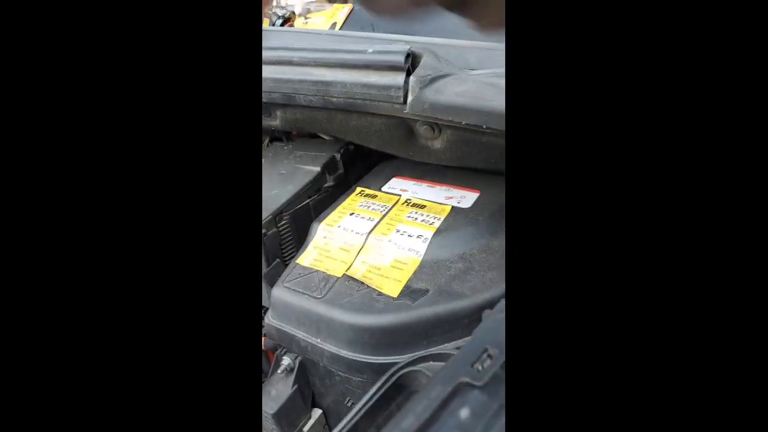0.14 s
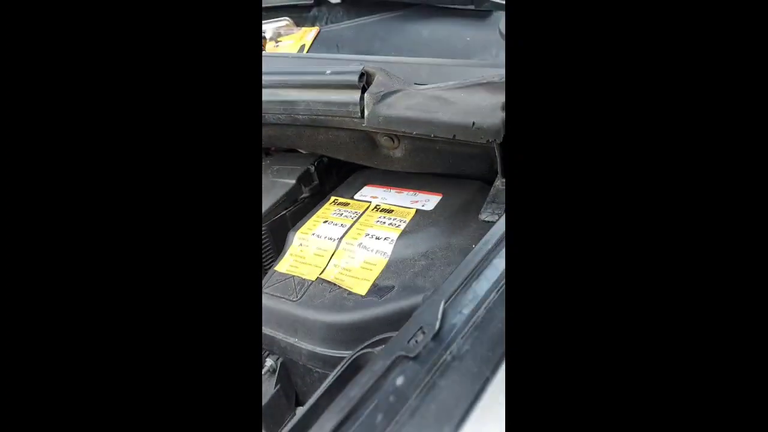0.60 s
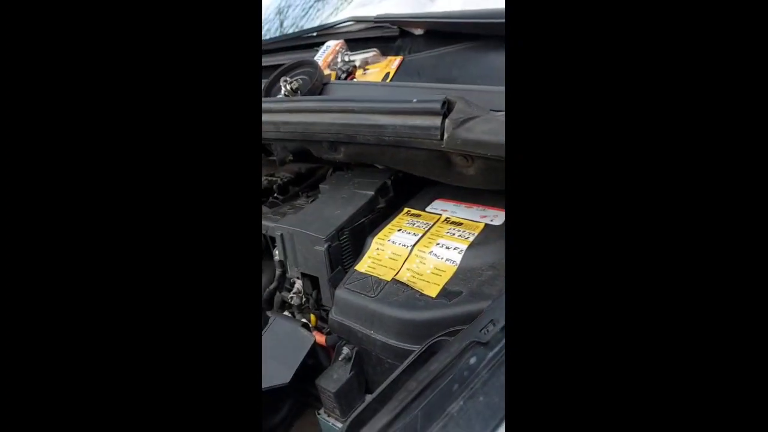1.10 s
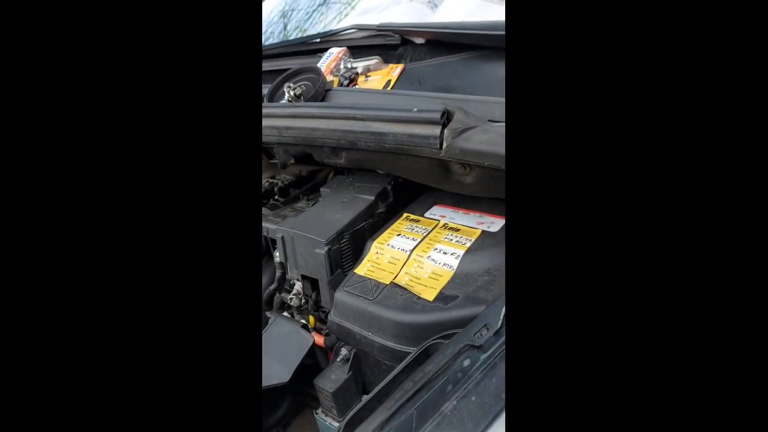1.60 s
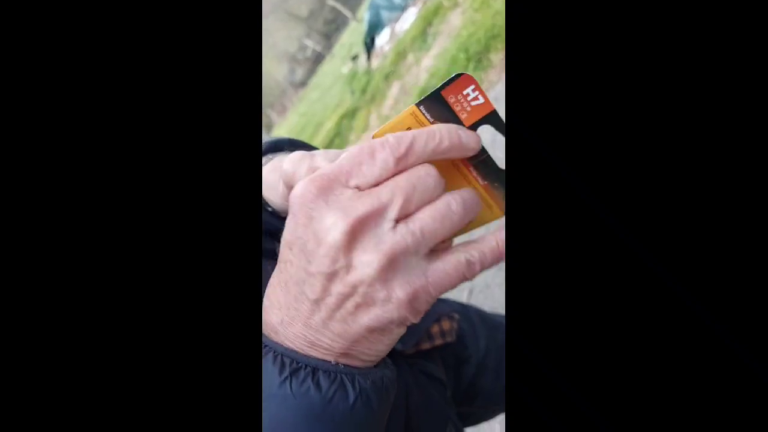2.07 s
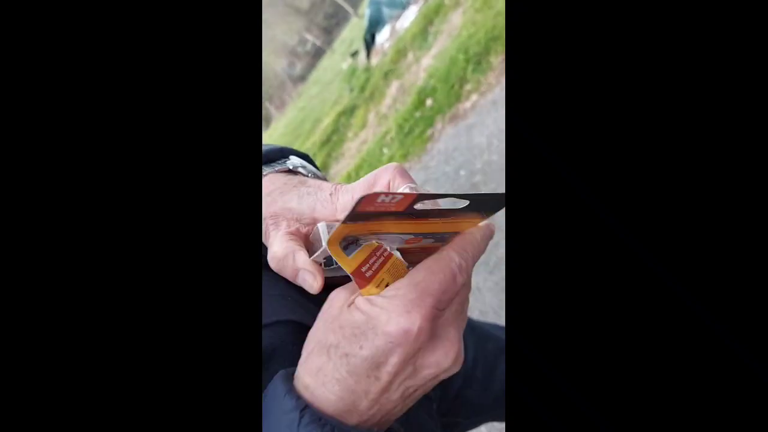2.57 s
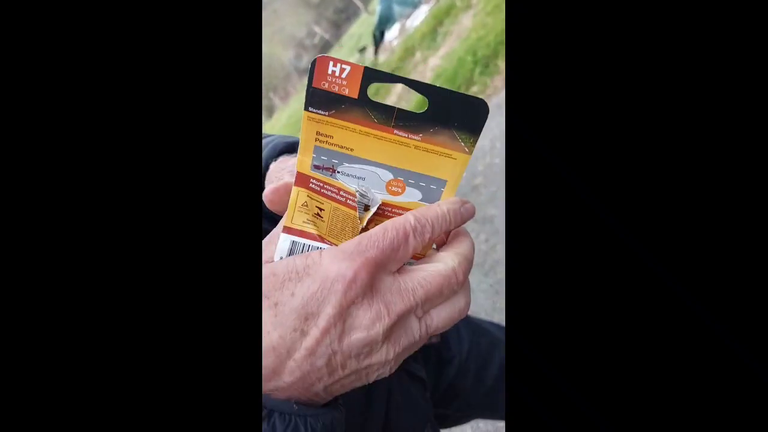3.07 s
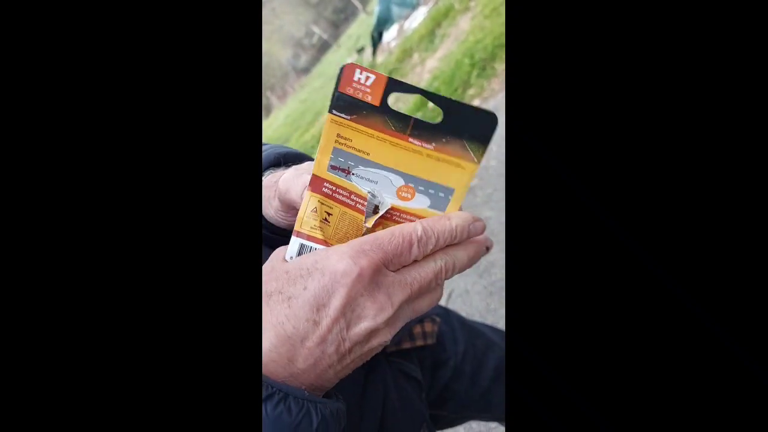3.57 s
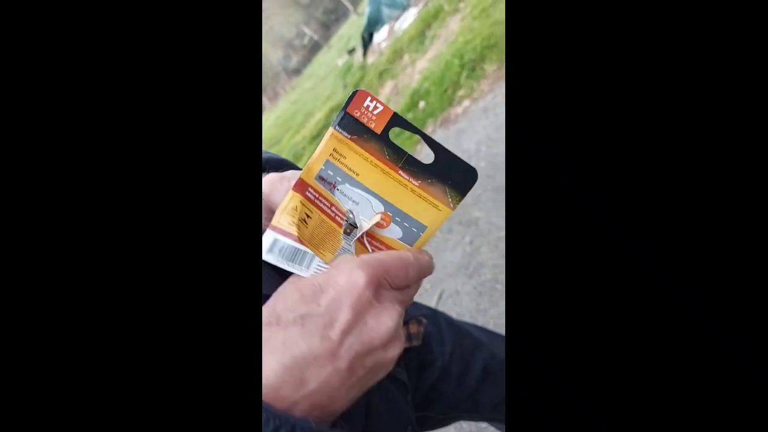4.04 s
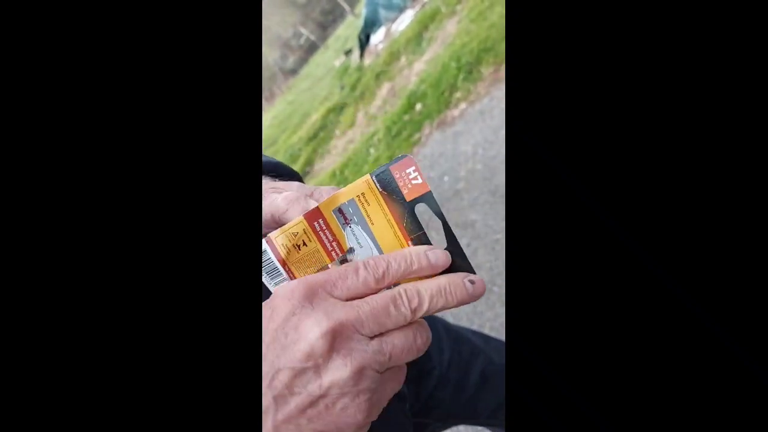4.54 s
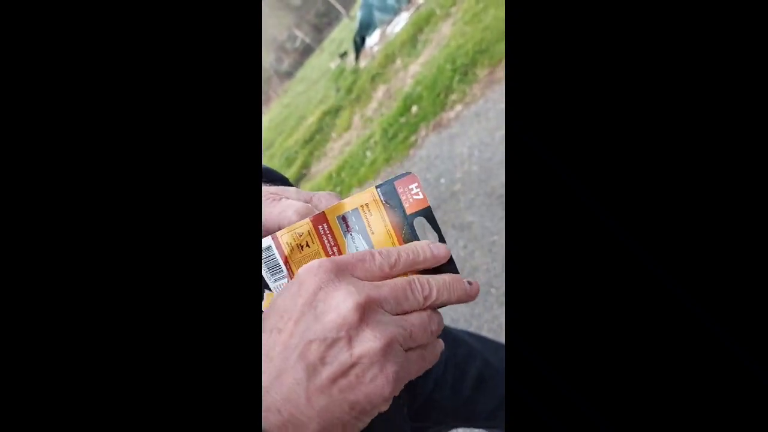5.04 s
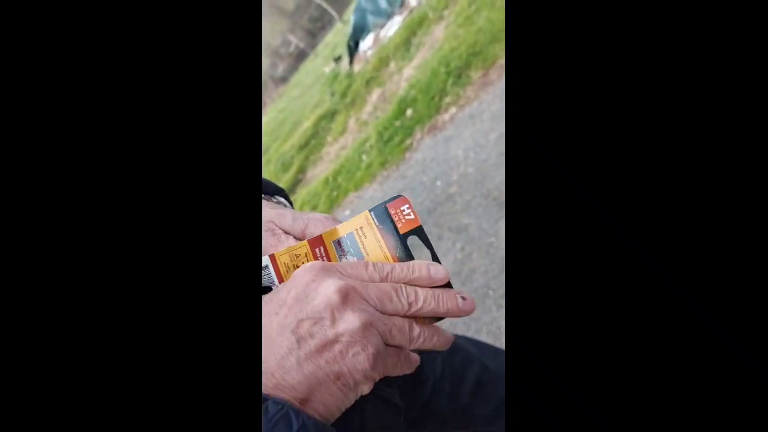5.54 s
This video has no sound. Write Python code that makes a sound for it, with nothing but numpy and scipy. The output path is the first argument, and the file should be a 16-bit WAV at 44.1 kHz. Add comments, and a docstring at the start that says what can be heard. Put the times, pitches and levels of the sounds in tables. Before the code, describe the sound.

Outdoors, hands work a card-and-plastic blister pack close to a phone's two microphone ports; dry, detailed stereo. From 0 to 1.2 s there are short rubs, papery creaks and light snaps, the clearest a hollow click at 0.15 s. A long, bright hiss of skin on glossy card runs about 1.2-1.5 s, ended by a dull, sagging finger tap on the right at 1.54 s. A crisp crack follows at 1.83 s. From 2 s the plastic buckles harder, with strong snaps near 2.15 and 2.57 s, a scraping rub, boxy thuds and lumpy low wind and grip noise, mainly left, heaviest around 2.9 s. Irregular crackles cluster near 3.5 s; a sharp, loud buckle hits at 4.11 s. Afterwards handling thins to small clicks and faint creaks. Low rumble swells on the left from 5.25 s, with a final snap near 5.57 s, over a faint wash of air.

```python
"""Hands turn and bend a card-and-plastic blister pack outdoors, close to a phone with two microphone ports.
It opens with short rubs (noise plus tiny slips), creaks (the same in card resonances) and light snaps (struck dents).
A long hiss of skin on glossy card follows, then the dull, sagging tap of a finger by the right port.
From two seconds the plastic buckles hardest, with thuds of the pack and lumpy low noise from wind and grip,
mostly at the left port; after four seconds the handling thins out, and rumble closes over a faint wash of air."""
import sys
import numpy as np
from scipy import signal
from scipy.fft import rfft, irfft, next_fast_len
from scipy.io import wavfile
from scipy.ndimage import uniform_filter1d, map_coordinates

SR = 44100
rng = np.random.default_rng(int(sys.argv[2]) if len(sys.argv) > 2 else 0)


def wrap_up_sound(samples):
    """Save the sound to the file named by the first command line argument, as 16-bit audio."""
    columns = np.atleast_2d(samples).T
    # keep every value between -1 and 1, then stretch to whole-number steps
    tamed = np.clip(columns, -1, 1)
    steps = np.round(tamed * 32767).astype(np.int16)
    wavfile.write(sys.argv[1], SR, steps)


def gain_from_decibels(decibels):
    """Convert decibel values to linear amplitude factors."""
    exponent = np.asarray(decibels, float) / 20
    return 10 ** exponent


N = 248883  # length in samples


def unit(x):
    """Scaled to rms 1."""
    return x / np.sqrt(np.mean(x ** 2) + 1e-20)


def along(points, hz):
    """(f/Hz, value) points read on a log frequency axis."""
    f, v = np.transpose(points)
    return np.interp(np.log(hz + 1), np.log(f + 1), v)


def curves(rows, t=None):
    """One value per moment for each column after the time; every sample unless times t are given."""
    s, *columns = np.transpose(rows)
    moments = np.arange(N) / SR if t is None else t
    return [np.interp(moments, s, column) for column in columns]


def wobble(rate):
    """A smooth random curve, rate knots a second."""
    knots = rng.standard_normal(int(N * rate / SR) + 4)
    return map_coordinates(knots, [np.arange(N) * rate / SR])


def filtered(x, response):
    """x through a complex response of frequency, with room for the tail."""
    m = next_fast_len(x.shape[-1] + 8192)
    return irfft(rfft(x, m) * response(np.fft.rfftfreq(m, 1 / SR)), m)[..., :x.shape[-1]]


def coloured(spectrum):
    """Response of a (f/Hz, level/dB) spectrum."""
    return lambda hz: gain_from_decibels(along(spectrum, hz))


def resonant(modes):
    """Causal response of (f/Hz, width/Hz, level/dB) resonances, summed with alternating sign."""
    def response(f):
        total = 0
        for k, (centre, width, db) in enumerate(modes):
            mode = 1j * f * width / (centre * centre - f * f + 1j * f * width)
            total = total + (-1) ** k * gain_from_decibels(db) * mode
        return total
    return response


def swells(s, rise, hold, fall, peak_db, rest_db):
    """Level in dB of events that fade in, hold and fade out over a resting level; their powers add."""
    fade_db = 20  # the drop spanned by one rise or fall
    t = np.arange(0, N + 32, 32) / SR
    before = (s[:, None] - t) / rise[:, None]
    after = (t - (s + hold)[:, None]) / fall[:, None]
    away = np.clip(np.maximum(before, after), 0, 10)
    power = np.sum(gain_from_decibels(peak_db[:, None] - fade_db * away) ** 2, axis=0)
    return 10 * np.log10(np.interp(np.arange(N) / SR, t, power) + gain_from_decibels(rest_db) ** 2)


# how the pack is held: (t/s, level/dB of faint rubbing between strokes, tilt of the hiss/dB per octave,
# f/Hz of the bent panel, drumming level/dB at the pivot creak, coarseness of the contact: 1 = usual)
HOLD = [(0, -54, -2.5, 1510, -60.5, .7), (.3, -61, 0.5, 1300, -56, 0.51), (.5, -62, 0.5, 1900, -61, 1.37),
        (.63, -61.5, 1, 2000, -61.5, 1.47), (.85, -83, -1, 1700, -62.5, 1.7),
        (1.2, -87, -2, 1900, -64.5, 0.26), (1.5, -80, -2, 1810, -60.5, 0.36),
        (1.7, -70, 3, 1480, -61.5, 0.9), (2.05, -56.5, -3, 1140, -64.5, 1.04),
        (2.3, -59, -1.5, 1620, -60, 1.47), (2.58, -64, 3, 970, -53.5, 1.07),
        (2.72, -66, -0.5, 1340, -45, 1.43), (2.95, -77, -1.5, 1000, -60, 0.81),
        (3.25, -66, -1.5, 1330, -61.5, 1.1), (3.6, -70, -1.5, 1110, -64.5, 1.23),
        (4.0, -67, 1, 1530, -66.5, 1.23), (4.13, -70, -2, 1300, -61.5, 1.3),
        (4.6, -65, -0.5, 1816, -68, 0.54), (5.1, -81, -0.5, 1560, -69, 0.8),
        (5.64, -55, -6.5, 1160, -56, 1.16)]


def grip(t=None):
    """The hold of the hands over time: rest level, hiss tilt, panel pitch, drumming level, coarseness."""
    return curves(HOLD, t)


def friction(grains, spread_db, grit):
    """Two draws of a rubbing force: smooth noise plus tiny slips of unequal size at shared moments."""
    *_, coarseness = grip()
    slips = (rng.random(N) < grains / SR) * gain_from_decibels(spread_db * rng.standard_normal(N))  # grains per second
    return rng.standard_normal((2, N)) * np.sqrt(1 + (grit * coarseness * unit(slips)) ** 2)


def shifting(x, gain_db, patchy_db, size):
    """Colour that moves: gain_db(Hz, s) plus random patches, as the contact wanders over the sheet."""
    hz, t, z = signal.stft(x, SR, nperseg=256)
    *_, coarseness = grip(t)
    field = rng.standard_normal(z.shape[1:])
    field = uniform_filter1d(uniform_filter1d(field, size[0], 0), size[1], 1)  # bins, then frames
    gain = gain_from_decibels(gain_db(hz[:, None] + 1, t) + patchy_db * coarseness * unit(field))
    power = np.mean(np.abs(z) ** 2, axis=(0, 2))[:, None]
    gain /= np.sqrt(np.sum(power * gain ** 2, axis=0) / power.sum())  # the loudness stays
    return unit(signal.istft(z * gain, SR, nperseg=256)[1][:, :N])


# bright colour of the glossy card, shared by hiss and cracks: (f/Hz, relative level/dB per Hz)
GLOSS_COLOUR = [(880, -21), (1500, -6), (1710, -41), (2050, -9), (2790, -1.5), (3730, -4), (4470, -1.5),
                (7310, -6.5), (11200, -2.5), (15200, -6.5), (16000, -62), (16500, -75)]
# strokes of the hands over the pack:
# (t/s at full force, rise/s, hold/s, fall/s, hiss level/dB, creak level/dB); rise and fall span 20 dB
HAND_STROKES = [(0.142, .06, .002, 0.13, -49, -40), (0.318, 0.24, .002, 0.085, -50, -75),
                (0.46, .1, .002, 0.059, -50, -62.5), (0.527, 0.023, .002, .1, -50, -51),
                (0.57, 0.044, 0.037, 0.021, -40, -59), (0.66, 0.0087, .002, 0.14, -42, -53.5),
                (0.709, 0.069, 0.057, 0.035, -43, -57.5), (0.958, 0.012, .002, .06, -50.5, -71),
                (1.061, 0.13, .002, 0.092, -48, -51), (1.275, 0.18, .19, 0.1, -37, -44.5),
                (1.5, .1, 0.048, 0.026, -44.5, -53.5), (1.842, 0.013, .002, 0.022, -41, -52),
                (1.89, 0.067, .002, 0.049, -68, -60), (1.994, 0.022, 0.17, 0.17, -52, -43.5),
                (2.21, 0.058, .002, 0.18, -42.5, -43.5), (2.303, 0.11, .002, 0.15, -49, -42.5),
                (2.497, 0.077, 0.015, 0.12, -49, -43.5), (2.566, 0.0091, 0.01, 0.05, -30.5, -22.5),
                (2.59, 0.039, 0.16, 0.1, -30.5, -41.5), (2.747, 0.13, .002, 0.077, -41, -28),
                (2.904, 0.018, 0.066, 0.021, -51, -47.5), (3.015, 0.029, .002, 0.076, -48.5, -45),
                (3.105, .21, .002, 0.087, -51.5, -46), (3.203, 0.0063, 0.012, 0.025, -41.5, -31),
                (3.236, 0.033, 0.026, 0.053, -44.5, -43), (3.33, 0.11, .002, 0.047, -57, -50),
                (3.391, 0.044, .002, 0.11, -61.5, -50), (3.484, 0.026, 0.066, 0.023, -37.5, -35.5),
                (3.657, 0.0084, .002, 0.18, -42, -43), (3.696, 0.05, .002, 0.17, -42.5, -41.5),
                (3.838, .3, .002, 0.041, -72, -42.5), (3.986, .3, 0.041, 0.023, -54.5, -50),
                (4.048, 0.006, 0.017, 0.062, -42.5, -34.5), (4.06, 0.035, .03, .05, -45, -46),
                (4.115, 0.02, 0.021, 0.044, -27.5, -33.5), (4.215, 0.068, 0.0018, 0.026, -46.5, -41.5),
                (4.314, 0.059, 0.064, 0.092, -49, -44), (4.599, 0.044, 0.0023, 0.31, -57, -52.5),
                (4.795, 0.041, 0.0088, 0.33, -63.5, -53), (4.953, 0.0062, .002, 0.054, -51, -43.5),
                (5.151, .08, .002, 0.092, -53, -47), (5.248, 0.027, .002, 0.32, -58, -51.5),
                (5.471, 0.12, .002, 0.13, -54.5, -51), (5.567, 0.049, .002, 0.049, -46, -40)]


def slide():
    """Skin over gloss: a dense hiss, a little unsteady as the skin grips and lets go."""
    s, rise, hold, fall, hiss_db, _ = np.transpose(HAND_STROKES)
    rest_db, _, _, _, coarseness = grip()

    def tilt_db(hz, t):
        return grip(t)[1] * np.log2(np.clip(hz, 2500, None) / 6500)

    hiss = filtered(friction(grains=970, spread_db=2.5, grit=0.48), coloured(GLOSS_COLOUR))
    hiss = shifting(hiss, tilt_db, patchy_db=3.0, size=(3, 22))
    unsteady_db = coarseness * (1.05 * wobble(60) + 0.93 * wobble(200))
    return gain_from_decibels(swells(s, rise, hold, fall, hiss_db, rest_db) + unsteady_db) * hiss


# resonances of the card: (f/Hz, width/Hz, relative level/dB)
CARD_MODES = [(970, 435, -6.5), (1300, 405, -2.5), (1700, 1013, 1), (2130, 1500, -2.5), (2780, 280, -10)]
# air under the blister: (f/Hz, width/Hz, relative level/dB)
HOLLOW_MODES = [(303.7, 52, -0.5), (510, 246, -5.5)]


def bend():
    """Fibres slip in clumps and excite the card, most near the pitch of the bent panel; the hollow drums along."""
    s, rise, hold, fall, _, peak_db = np.transpose(HAND_STROKES)
    rest_db, _, _, hollow_db, _ = grip()
    creak_db = swells(s, rise, hold, fall, peak_db, rest_db)
    drum_db = hollow_db + 0.61 * (creak_db + 57)  # dB of drumming per dB of creak, pivoting at -57 dB

    def panel_db(hz, t):
        return 6 * np.exp(-(np.log2(hz / grip(t)[2]) / 0.58) ** 2)

    force = friction(grains=350, spread_db=4.5, grit=0.68) * gain_from_decibels(2.27 * wobble(70))
    creak = filtered(force, resonant(CARD_MODES))
    creak = filtered(creak, lambda f: 1 / (1 + (450 / (f + 1)) ** 4))  # thin out the bass
    creak = shifting(creak, panel_db, patchy_db=3.0, size=(2, 6))
    drum = unit(filtered(force, lambda f: resonant(HOLLOW_MODES)(f) / (1 + (f / 700) ** 4)))
    return gain_from_decibels(creak_db) * creak + gain_from_decibels(drum_db) * drum


# plastic snaps, as sent to the ports:
# (t/s, ring peak level/dB, dent f/Hz, crack peak level/dB, t60/s, used up to 0.07)
PLASTIC_SNAPS = [(0.1213, -29.5, 2000, -55, .019), (0.1445, -14, 1730, -35, 0.029),
                 (0.3073, -66, 3430, -31, 0.026), (.351, -35, 1230, -33, 0.027),
                 (0.3814, -39, 3080, -34, .019), (.388, -32.5, 2960, -29.5, .017),
                 (0.4554, -34.5, 1460, -22, 0.011), (0.46, -51, 1430, -21, 0.0091),
                 (0.4754, -37, 1120, -46, 0.038), (0.5305, -31.5, 2360, -31, 0.062),
                 (0.6043, -52, 2260, -21, 0.015), (.6519, -31.5, 3370, -22.5, 0.013),
                 (0.7004, -34.5, 1800, -23, 0.079), (0.9554, -36, 3500, -44, 0.077),
                 (1.0418, -36.5, 1870, -53, 0.038), (1.0571, -42, 2830, -16, .0083),
                 (1.1, -40, 950, -24, 0.0088), (1.1287, -44, 940, -16.5, 0.0056),
                 (1.5377, -38.5, 1080, -25.5, 0.022), (1.8342, -21.5, 1700, -8.5, 0.019),
                 (2.0108, -42, 1800, -30.5, 0.038), (2.1291, -11, 1600, -20, .016),
                 (2.184, -13, 3000, -21, 0.032), (2.2022, -21.5, 1140, -31, 0.044),
                 (2.3485, -28, 1180, -27, .026), (2.5655, -11, 990, -22, 0.015),
                 (2.5691, -5.5, 980, -9, .021), (2.5982, -12.5, 960, -19.5, 0.05),
                 (2.626, -20, 1000, -21, .03), (2.745, -18, 1850, -37, 0.031),
                 (2.903, -34, 756, -34, 0.054), (2.971, -31, 1010, -35, 0.041),
                 (3.0229, -24, 1130, -35, 0.048), (3.0998, -35, 1120, -19, 0.0093),
                 (3.198, -29, 1530, -31, 0.09), (3.375, -39.5, 880, -44, 0.061),
                 (3.4804, -26.5, 970, -28, 0.029), (3.4952, -19.5, 780, -25, 0.081),
                 (3.507, -22, 1030, -19, 0.038), (3.526, -16.5, 1060, -20, 0.013),
                 (3.5345, -19, 1070, -37, 0.014), (3.551, -30, 1010, -35, 0.042),
                 (3.5725, -40, 990, -43, 0.012), (3.6546, -47, 1050, -36.5, 0.087),
                 (3.6865, -28, 1070, -43, 0.035), (3.703, -29, 2080, -48, 0.024),
                 (3.823, -33, 1520, -54, 0.014), (3.9397, -24.5, 1120, -23, 0.017),
                 (4.0016, -40, 980, -41, 0.029), (4.0415, -17.5, 1820, -33, 0.019),
                 (4.0522, -26, 1930, -42, 0.014), (4.058, -13, 1950, -27, 0.017),
                 (4.1057, -20.5, 1100, -36, 0.054), (4.114, -3.5, 1130, -10, 0.014),
                 (4.124, -18, 1130, -35, 0.019), (4.132, -26, 1310, -29, 0.05),
                 (4.2113, -29, 615, -36, 0.021), (4.304, -33.5, 1550, -35, 0.029),
                 (4.319, -29.5, 1550, -46, 0.026), (4.334, -25.5, 1470, -30, 0.031),
                 (4.38, -20, 1500, -28.5, 0.014), (4.409, -40, 1500, -51, 0.019),
                 (4.459, -41.5, 1110, -54, .015), (4.502, -36, 1700, -48, 0.018),
                 (4.7722, -45, 1550, -35.5, 0.016), (4.812, -40.5, 1590, -45, 0.038),
                 (4.9256, -32, 1560, -56, 0.014), (4.9534, -28.5, 1730, -36.5, 0.035),
                 (4.9608, -26, 1590, -33, 0.011), (5.196, -40, 1580, -54, 0.016),
                 (5.2511, -37.5, 1260, -38, 0.023), (5.278, -44, 900, -50, .02),
                 (5.3845, -38.5, 1550, -42.5, 0.041), (5.4255, -45, 800, -30.5, 0.017),
                 (5.4608, -38, 824, -58, 0.069), (5.474, -27, 1930, -39.5, 0.031),
                 (5.5406, -39, 1770, -36.5, 0.037), (5.5673, -15.5, 1285, -32, 0.01),
                 (5.5994, -23, 2110, -34, 0.019)]
# the whole pack jolting in the hands: (f/Hz, width/Hz, relative level/dB)
THUD_MODES = [(110, 110, -2), (358, 285, 10.5)]
# moments of the jolts: (t/s, thud peak level/dB, as sent to the ports)
PACK_JOLTS = [(0.305, -46), (0.6038, -50), (1.0433, -44.5), (1.6949, -50.5), (1.8356, -25.5), (2.0133, -44),
              (2.1291, -22.5), (2.2033, -28.5), (2.3475, -47), (2.7463, -21.5), (2.878, -40), (2.904, -29),
              (2.9697, -33), (3.0228, -41), (3.1005, -39), (3.201, -31), (4.113, -25.5), (4.41, -44),
              (5.542, -46), (5.5683, -29)]


def snaps():
    """Each buckle is a sudden shove that rings its dent and the card, a bright crack and one low push of the pack."""
    out, t = np.zeros((2, N + SR)), np.arange(SR // 16) / SR
    thud_under_ring_db = 28  # every snap pushes the pack a little
    kick, kick_t60_s = 3.26, 0.017  # instant of buckling over the scrape after it, for a snap this short

    def peak(x):
        return x / np.abs(x).max()

    for s, ring_db, dent_hz, crack_db, t60 in PLASTIC_SNAPS:
        t60 = np.clip(t60, 0.002, 0.07)
        shape = (1 - np.exp(-35 * t / t60)) * gain_from_decibels(-60 * t / t60)  # a slow buckle also builds up more slowly
        shove = rng.standard_normal((2, 2, len(t))) * shape
        shove[:, 0, shape.argmax()] += kick * kick_t60_s / t60
        dent = resonant([(dent_hz, 0.25 * dent_hz, 5)])
        ring = filtered(shove[0], lambda f: (dent(f) + resonant(CARD_MODES)(f)) / (1 + 1j * f / 4000) ** 2)
        crack = filtered(shove[1], coloured(GLOSS_COLOUR))
        out[:, round(s * SR):][:, :len(t)] += gain_from_decibels(ring_db) * peak(ring) + gain_from_decibels(crack_db) * peak(crack)

    push = t / 0.0006 * np.exp(-t / 0.00027)  # one soft-edged pulse
    thud = peak(filtered(push, resonant(THUD_MODES)))
    small_pushes = [(s, ring_db - thud_under_ring_db) for s, ring_db, *_ in PLASTIC_SNAPS]
    for s, thud_db in PACK_JOLTS + small_pushes:
        out[0, round(s * SR):][:len(t)] += gain_from_decibels(thud_db) * thud  # the draw that both ports share
    return out[:, :N]


# where the hands are: (t/s, left-right level/dB of the treble, left-right level/dB of the mids, left port lag/ms)
HAND_PLACES = [(0, 2.5, -2.5, 0.12), (.5, 2, 3.5, 0.041), (.9, -3.5, 3, 0.089), (1.1, 6, 3, 0.19),
               (1.45, -4, 0.5, 0.26), (1.55, -10, -4.5, 0.2), (1.8, -10, -0.5, -0.093),
               (2.05, -9.5, -3, -0.23), (2.6, -1, -5, -0.075), (3.1, -1, -2, -0.17),
               (3.6, -2.5, -4.5, -0.14), (4.1, -2.5, -4, -0.082), (4.6, -3, -6, -0.074),
               (5, -4, -6, -0.089), (5.64, -3.5, -5, -0.082)]
# how alike the ports hear: (f/Hz, left-right likeness, 1 = the same)
PORT_LIKENESS = [(100, 1), (400, 0.95), (1500, 0.78), (3000, 0.34), (6000, 0.063), (12000, 0.19)]
# the phone body shades the ports: (f/Hz, left-right level/dB, added to that of the hands)
BODY_SHADE = [(60, 0), (150, -4), (380, 7.5), (950, 1.5), (2380, -0.5), (5980, 4.5), (15000, -2)]


def ports(pair):
    """Two ports hear the hands alike in the bass, unlike in the treble, one a little later than the other."""
    hz, t, (shared, opposed) = signal.stft(pair, SR, nperseg=128)
    f = hz[:, None]
    treble_db, mids_db, lag_ms = curves(HAND_PLACES, t)
    pan_db = treble_db + (mids_db - treble_db) / (1 + (f / 5700) ** 4)  # treble starts at 5700 Hz
    turn = np.arccos(np.clip(along(PORT_LIKENESS, hz), -1, 1))[:, None] / 2
    # each port takes half of the level difference and half of the lag
    half = gain_from_decibels((along(BODY_SHADE, hz)[:, None] + pan_db) / 2) * np.exp(-1j * np.pi * f * lag_ms / 1000)
    left = (np.cos(turn) * shared + np.sin(turn) * opposed) * half
    right = (np.cos(turn) * shared - np.sin(turn) * opposed) / half
    return signal.istft(np.array([left, right]), SR, nperseg=128)[1][:, :N]


def tap():
    """A finger lands by the right port: one dull push on the phone body, its pitch sagging as it dies."""
    start_s, t60_s = 1.537, 0.032
    right_db, left_db = -18, -18 - 23
    end_hz, sag, sag_s = 90, 2.1, 0.0022  # start pitch is 1 + sag times higher
    t = np.clip(np.arange(N) / SR - start_s, 0, None)
    hz = end_hz * (1 + sag * np.exp(-t / sag_s)) * (t > 0)
    push = gain_from_decibels(-60 * t / t60_s) * np.sin(2 * np.pi * np.cumsum(hz) / SR)
    return gain_from_decibels([[left_db], [right_db]]) * push


# gusts on the ports: (t/s, level/dB at the nearer port, rise/s, fall/s, left-right level/dB);
# rise and fall span 20 dB
PORT_GUSTS = [(0, -59, .1, 0.2, 0), (1.04, -56, 0.077, 0.16, 10), (1.25, -58, .3, .3, -2),
              (1.88, -57, .1, 0.099, -6), (2.0, -36, 0.018, 0.13, 19), (2.04, -34, 0.049, 0.035, 16),
              (2.21, -31, 0.093, 0.11, 13), (2.361, -32, 0.025, 0.072, 9), (2.48, -38.5, 0.071, .055, -2),
              (2.63, -27, 0.061, 0.096, 18), (2.77, -39, .12, 0.14, 2), (2.883, -21.5, .008, 0.076, 21),
              (3.0, -34.5, 0.12, .06, 7), (3.17, -47, 0.11, .08, -9), (3.22, -51, .08, .08, 3),
              (3.5, -44, .08, 0.076, -8), (3.77, -58, .15, 0.17, 0), (4.13, -56, 0.078, .06, 1),
              (4.68, -49.5, 0.049, 0.034, 25), (5.125, -51, 0.013, .11, 13), (5.255, -43, .015, 0.085, 30),
              (5.431, -37.5, 0.023, .1, 17), (5.455, -38, .03, 0.11, 16), (5.56, -29, 0.049, 0.043, 21),
              (5.625, -23.5, .035, 0.23, 33)]
# colour of the rumble: (f/Hz, relative level/dB per Hz)
RUMBLE_COLOUR = [(15, -40), (25, -15), (48, 6), (86, 7.5), (194, -8), (220, -13.5), (290, -24), (480, -120)]


def buffet():
    """Wind and grip: lumpy low pressure, different at each port; most of the strong gusts strike the left one."""
    s, peak_db, rise, fall, pan_db = np.transpose(PORT_GUSTS)
    calm_db = -73  # rumble between gusts
    level_db = []
    for side in (1, -1):  # left, right
        port_db = peak_db + np.minimum(side * pan_db, 0)
        level_db.append(swells(s, rise, 0 * s, fall, port_db, calm_db))
    lumps = gain_from_decibels(1.7 * np.array([wobble(12), wobble(4.7)]))
    low = unit(lumps * filtered(rng.standard_normal((2, N)), coloured(RUMBLE_COLOUR)))
    return gain_from_decibels(np.array(level_db)) * low


# quiet outdoor air: (f/Hz, relative level/dB per Hz)
AIR_COLOUR = [(18, -38), (30, 19), (91, 12), (217, 12.5), (314, 2.5), (771, 5), (1840, -13.5), (3750, -2),
              (12300, -11.5), (15200, -22), (16500, -67)]


def air():
    """The faint steady wash of the open air: coloured noise at -65 dB rms."""
    return gain_from_decibels(-65) * unit(filtered(rng.standard_normal((2, N)), coloured(AIR_COLOUR)))


def scene():
    """Hands on the pack heard through the ports, a finger and wind on the ports, open air."""
    pack = slide() + bend() + snaps()
    return ports(pack) + tap() + buffet() + air()


def band_limit(x):
    """A steep low-pass at the top of the band."""
    return signal.sosfilt(signal.butter(12, 16610, fs=SR, output="sos"), x)


def record(dry):
    """The microphones drop the deepest bass, through two gentle high-passes at 32 Hz."""
    heard = filtered(dry, lambda f: (1j * f / (32 + 1j * f)) ** 2)
    return band_limit(heard)


dry = scene()
out = record(dry)
wrap_up_sound(out)
```